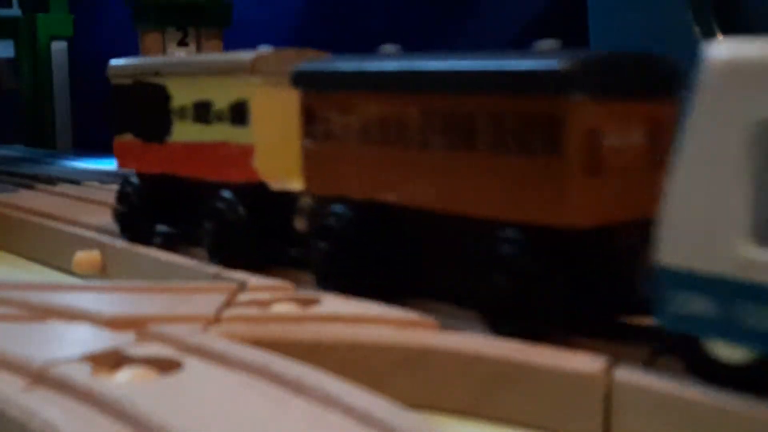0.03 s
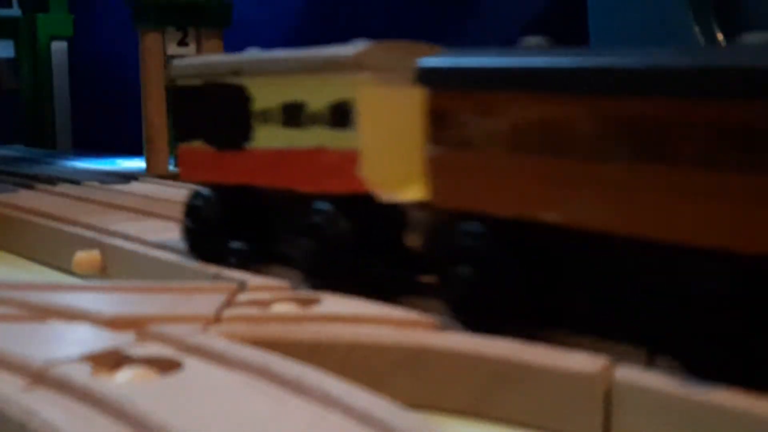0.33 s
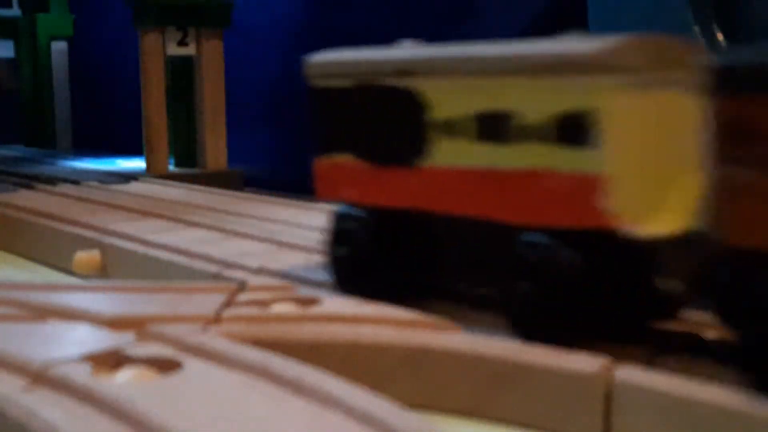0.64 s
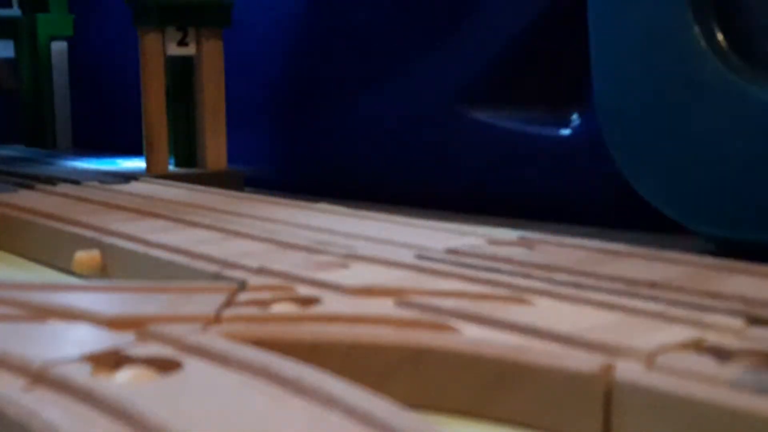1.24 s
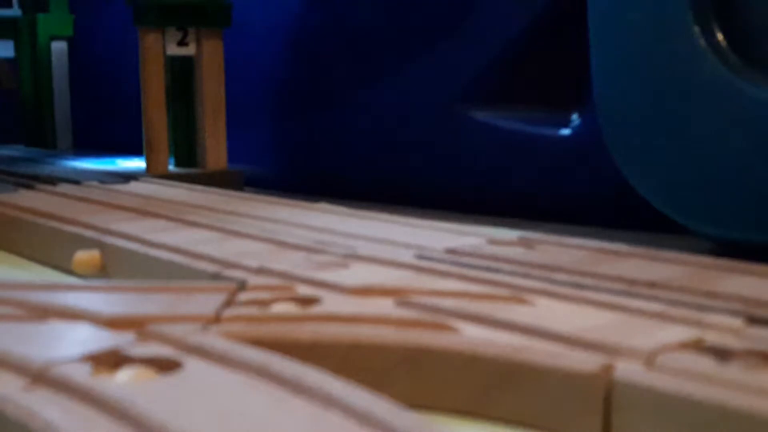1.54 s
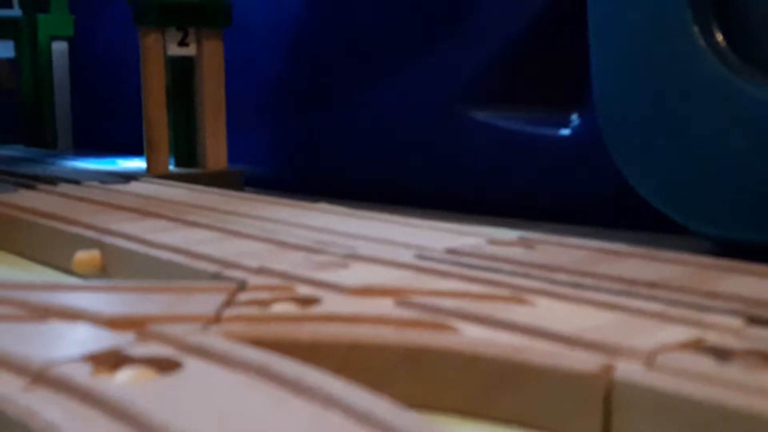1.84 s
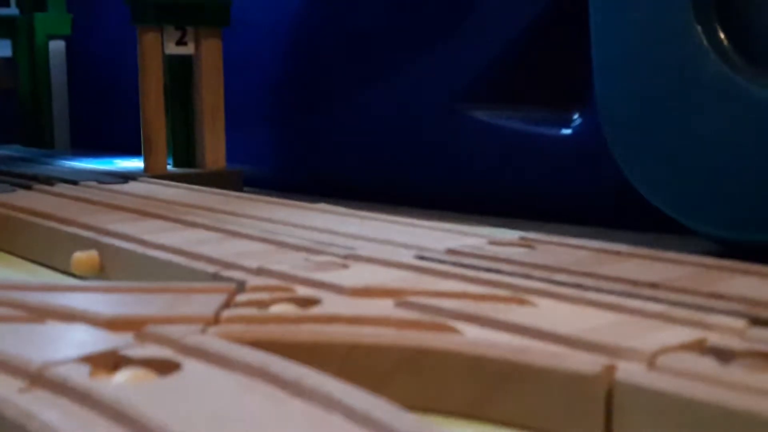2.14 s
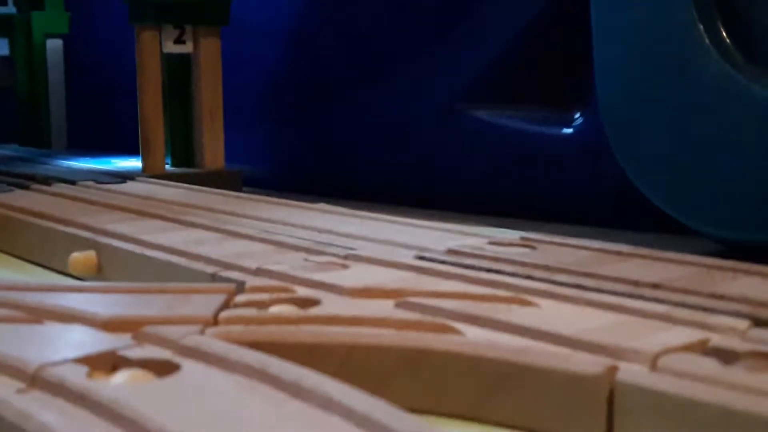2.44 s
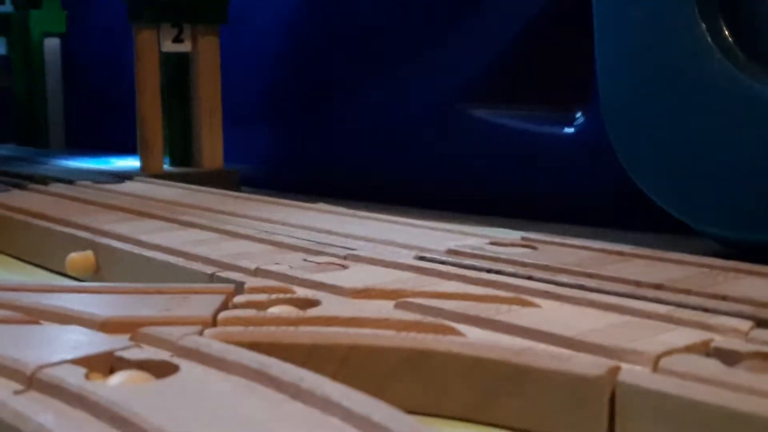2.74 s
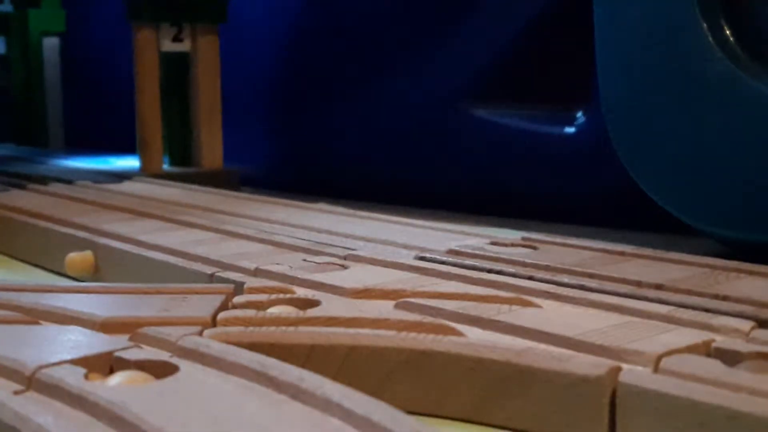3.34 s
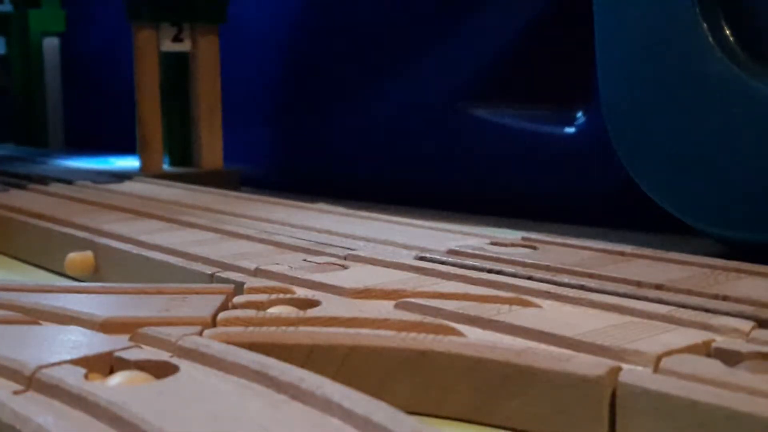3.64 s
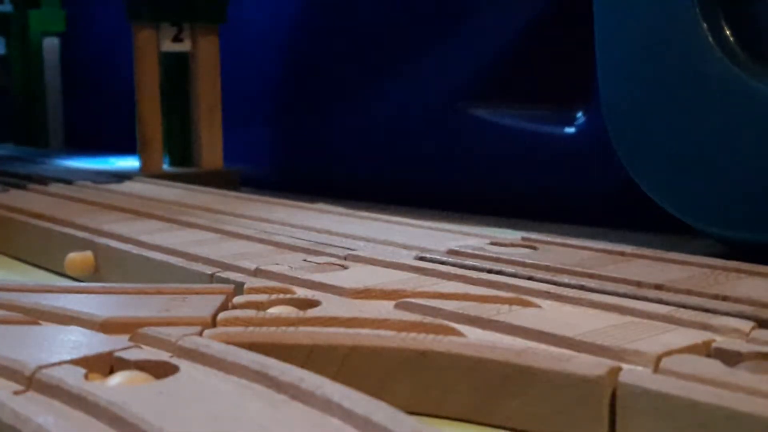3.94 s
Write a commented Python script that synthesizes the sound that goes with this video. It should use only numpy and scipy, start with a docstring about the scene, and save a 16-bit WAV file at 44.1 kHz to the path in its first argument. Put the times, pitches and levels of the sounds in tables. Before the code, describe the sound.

Close by and a little to the right, a toy train rumbles along wooden track, its loose carriages clattering and axles squeaking. It slows and stops, leaving a small, quiet room with a few faint clicks and two soft rubs.

```python
"""A plastic toy train rolls along wooden track, close by and a little to the right, in a small room.
From the start its wheels rumble on the wood and knock over the joints, loose carriages rattle and dry
axles stick and slip in tiny squeaks. After two seconds it stops with a soft bump that leaves the track
humming briefly. Past the three-second mark, faint handling clicks on a hollow case and two soft rubs
come through the still air."""
import sys
import numpy as np
from scipy import signal
from scipy.fft import rfft, irfft
from scipy.io import wavfile

SR = 44100
rng = np.random.default_rng(int(sys.argv[2]) if len(sys.argv) > 2 else 0)


def generate_wav(sig):
    """Save sig (samples, or channels by samples) to the path in sys.argv[1] as 16-bit PCM at SR."""
    pcm = np.round(np.clip(np.atleast_2d(sig).T, -1, 1) * 32767).astype(np.int16)
    wavfile.write(sys.argv[1], SR, pcm)


N = 176400
TIME = np.arange(N) / SR

# Fader rides for the rumble, the carriage chatter and the grit. Each row: time in seconds, level in dB.
RUMBLE_RIDE = [(0.0, -30.5), (0.08, -38.5), (0.53, -30.5), (0.55, -26.5), (0.88, -33.5), (0.95, -29.5),
               (1.01, -29.5), (1.03, -30.5), (1.2, -34), (1.22, -27), (1.27, -34.5), (1.39, -29.5),
               (1.55, -38.5), (1.7, -37.5), (1.72, -33), (1.84, -43), (1.89, -39), (2.0, -49)]
CHATTER_RIDE = [(0, -38), (.07, -50.5), (.26, -53), (.45, -41), (.5, -41.5), (.62, -30.5), (.68, -44.5),
                (.88, -43), (1.0, -38.5), (1.12, -39.5), (1.38, -44.5), (1.5, -46.5), (1.8, -53),
                (1.88, -53), (2.0, -61)]
GRIT_RIDE = [(0, -50), (.15, -55), (.4, -53), (.55, -51), (.62, -49), (.68, -61), (.8, -52.5), (1.0, -49.5),
             (1.15, -54), (1.4, -55.5), (1.55, -56), (1.7, -65), (1.87, -63.5), (2.0, -71)]
# Wheels strike joints and couplings jerk. Each row: start in seconds, relative levels in dB of the
# wood thud, the carriage clack and the wheel tick, pitch of the struck part in Hz.
KNOCKS = [(.055, -41.5, -27, -50, 1580), (.104, -41, -32, -48, 2190), (.178, -40, -35, -52.5, 1577),
          (.218, -38, -28, -51.5, 1560), (0.236, -38, -28.5, -48.5, 3429), (0.292, -25, -24.5, -48, 2430),
          (0.3081, -16, -27.5, -52, 1380), (0.3275, -22.5, -22, -41.5, 1596), (.377, -42.5, -26, -52, 2290),
          (0.4082, -30.5, -30, -41, 2550), (0.4392, -21.5, -20.5, -35.5, 1630),
          (.446, -26.5, -26, -39, 2690), (.463, -27, -28, -38, 2304), (0.525, -27, -25, -30.5, 1650),
          (0.547, -18, -20, -29.5, 1661), (0.551, -28.5, -28, -37, 2210), (0.5622, -9.5, -29, -35, 1700),
          (0.566, -12, -36, -41, 2290), (0.6022, -34.5, -16, -26, 1820), (0.6074, -22, -45, -18.5, 1640),
          (0.6138, -16.5, -21, -34.5, 2550), (0.623, -9.5, -24, -39.5, 1460), (0.6406, -14, -26, -25, 2270),
          (0.6954, -28.5, -28.5, -39, 2360), (0.7448, -32, -41, -31.5, 1740),
          (0.752, -20.5, -27.5, -40.5, 1930), (.768, -32, -18.5, -30, 3420), (.8, -29.5, -39, -46.5, 1830),
          (.855, -27, -21.5, -38.5, 1647), (0.9419, -17, -48, -40.5, 1532),
          (0.9951, -23.5, -18.5, -29, 1620), (1.0308, -33, -23, -43, 2450), (1.038, -9, -22.5, -36.5, 2320),
          (1.0516, -18, -20.5, -40, 1650), (1.0891, -16, -17.5, -25, 1320),
          (1.145, -16, -25.5, -32.5, 2160), (1.1766, -21, -21.5, -39, 1640),
          (1.1912, -36.5, -17.5, -31, 1490), (1.207, -23.5, -19.5, -35, 1630),
          (1.2288, -15.5, -26, -36, 1920), (1.242, -31.5, -31.5, -47.5, 1700),
          (1.289, -35, -23.5, -29, 1990), (1.331, -20.5, -23, -44, 2090), (1.346, -28, -25.5, -39, 2110),
          (1.3666, -20, -38.5, -35, 2000), (1.3709, -16.5, -21, -32.5, 2060),
          (1.4283, -30.5, -22, -31.5, 1610), (1.456, -31.5, -31, -45, 1690),
          (1.583, -32.5, -28, -35.5, 1860), (1.7137, -29, -29.5, -48, 1760),
          (1.7276, -21.5, -57, -38.5, 1400), (1.7615, -24, -37, -44, 1400), (1.7854, -24, -34, -57, 2130),
          (1.879, -38.5, -34.5, -49, 1765), (1.921, -35, -35.5, -53, 1771), (1.975, -42.5, -36, -61, 1780)]
# Loose track rocks with a hollow note. Each row: start in seconds, level in dB, pitch in Hz.
LOOSE_TRACK = [(.002, -10.5, 574), (0.11, -23.5, 550), (.186, -25.5, 547), (0.448, -20, 457),
               (.548, -20.5, 322), (0.619, -21, 376), (0.718, -21.5, 540), (0.75, -29, 280),
               (.849, -25, 236), (.918, -19.5, 375.9), (0.943, -18.5, 294), (.959, -24.5, 290),
               (1.037, -14, 511), (1.228, -27, 295), (1.323, -21.5, 383), (1.664, -30.5, 280),
               (1.719, -27.5, 268), (1.805, -27.5, 336), (1.921, -32, 372)]
# The colour of track, shells, wheels and axle scrape. Each row: frequency in Hz, relative level in dB.
WOOD_TONE = [(30, -48), (60, -36.5), (110, -12), (180, -8), (290, -1), (440, -3), (580, -2), (720, -5.5),
             (880, -14), (1200, -20.5), (2500, -38), (8000, -82)]
CARRIAGE_TONE = [(200, -42.5), (800, -17.5), (1200, -9), (1600, 4.5), (1950, 0), (2350, -3), (3100, -10),
                 (4300, -10.5), (6000, -24), (16000, -45)]
WHEEL_TONE = [(1000, -13.5), (3000, -19.5), (5000, -0.5), (6200, -3.5), (7500, 0), (8600, 2.5), (9700, -9),
              (12500, -4.5), (15500, -15.5)]
SCRAPE_TONE = [(2000, -20.5), (4500, -8), (6300, -12.5), (7000, -3), (7900, 1), (8800, 2.5), (10000, -23),
               (12500, -20.5), (14000, -6), (15500, -11.5)]
# Long rings of track and floor. Each row: pitch in Hz, relative level in dB, 60 dB decay in seconds.
TRACK_MODES = [(176.3, -3, 0.4), (194.6, 2, 0.39), (271.6, -2.5, 0.17), (375, 1, 0.49), (415, -4, 0.1474),
               (528, -0.5, .16), (582.4, -3.5, 0.31)]
# Axle squeaks. Each row: start and length in seconds, pitch in Hz, relative level in dB,
# stutter depth in dB, the octave against the fundamental in dB.
SQUEAKS = [(0.0, 0.0087, 7300, -25, 5, -14), (.0065, 0.0096, 7360, -17.5, -1, -14),
           (.018, 0.0087, 7570, -22.5, 0, -16), (0.024, 0.031, 7390, -35.5, -1, -22),
           (0.053, 0.0094, 7270, -22.5, -5, -20), (0.102, 0.025, 7430, -28, 7, -10.5),
           (0.121, 0.031, 7390, -31.5, -0.5, -17), (0.453, 0.013, 6950, -30.5, 5, 0),
           (0.492, 0.017, 7120, -25.5, 3, -4), (0.777, 0.016, 6910, -23.5, 3.5, -9.5),
           (0.786, 0.014, 7400, -40.5, -4, -17.5), (0.837, 0.015, 7270, -31.5, -0.5, -10.5),
           (0.853, 0.018, 6970, -28.5, -4.5, 6), (0.867, 0.014, 7420, -13.5, 3.5, -16.5),
           (0.882, 0.012, 7540, -15.5, 1, -11.5), (0.895, .034, 7390, -13.5, 0, -17),
           (0.932, 0.012, 7330, -13.5, -4, -32), (1.179, 0.01, 6800, -30.5, 14, -14),
           (1.245, 0.016, 6760, -30.5, 7, -18), (1.257, 0.028, 6940, -26.5, 2, -5.5),
           (1.292, 0.042, 6990, -38, 3, -23), (1.33, 0.028, 6910, -32, 5.5, -15),
           (1.501, 0.0063, 7100, -35, 11, -22), (1.671, 0.012, 7320, -38, 19, -24),
           (1.776, 0.011, 7390, -33, 9.5, -15), (1.985, 0.02, 7440, -41, -1, -23),
           (0.222, 0.022, 10800, -48.5, 1.5, -33), (0.413, 0.01, 10800, -43, 1.5, -36)]
# The track's hum at the stop. Each row: pitch in Hz, level in dB, 60 dB decay in seconds.
SETTLE_MODES = [(140, -47, .4), (175, -41, .4), (364, -48, .18)]
# Handling clicks. Each row: start in seconds, relative levels in dB of the snap and the hollow knock.
CLICKS = [(3.316, -49, -49.5), (3.3306, -38, -47), (3.378, -49.5, -42.5), (3.383, -56, -46),
          (3.412, -51, -64), (3.4255, -36, -56), (3.433, -54, -56), (3.748, -49, -63), (3.7685, -42, -61),
          (3.858, -60, -44.5), (3.873, -48.5, -66)]
# Crisp edges on the sharpest clicks. Each row: start in seconds, level in dB.
CRISP_EDGES = [(3.3313, -30), (3.7682, -34), (3.858, -50), (3.872, -40)]
# Fader rides for the rubs and the hiss that ends the first. Each row: time in seconds, level in dB.
RUB_RIDE = [(3.46, -86.5), (3.505, -57.5), (3.575, -51.5), (3.6, -61), (3.63, -81), (3.82, -71.5),
            (3.86, -55), (3.9, -82)]
HISS_RIDE = [(3.53, -86.5), (3.555, -59), (3.585, -58), (3.61, -91)]
# The colour of each handling layer and of the air. Each row: frequency in Hz, relative level in dB.
SNAP_TONE = [(200, -17), (950, 2.5), (1600, -1.5), (2400, -5.5), (3150, 4), (4500, -14), (6200, -23.5),
             (8100, -7.5), (10000, -23), (13000, -12), (16000, -14.5)]
CASE_TONE = [(60, -15), (170, 3.5), (280, 4), (600, -10.5), (930, 7.5), (1200, -6), (2200, -4), (4000, -42),
             (12000, -42)]
CRISP_TONE = [(500, -16), (2000, -8), (5000, -2), (10000, -3), (15000, 2)]
RUB_TONE = [(59, -41), (100, -19.5), (264, -13.5), (347, -9), (429, -24.5), (564, -2), (614, -12.5),
            (1490, -17.5), (2750, -20.5), (5510, -36), (8230, -25), (15500, -33)]
HISS_TONE = [(2000, -20.5), (6500, -13.5), (8200, -3), (10000, -14.5), (13500, -1.5), (16000, -1.5)]
AIR_TONE = [(15, -38.5), (25, -13), (33, -8.5), (58, -2.5), (91, -8.5), (130, 2), (165, -4), (291, -3.5),
            (604, -8.5), (654, -9), (1510, -9.5), (5090, -23), (15800, -24)]
# How centred the air is. Each row: frequency in Hz, left-right correlation (negatives count as zero).
AIR_LIKENESS = [(60, 0.042), (240, 0.14), (950, -0.09), (3770, -0.04), (15000, 0.01)]
# The room's tail. Each row: frequency in Hz, 60 dB decay in seconds.
ROOM_T60 = [(150, 0.47), (500, 0.27), (2000, 0.4), (7500, 0.24), (15000, 0.17)]

BUMPS_PER_S, BUMP_SPREAD_DB = 1300, 3
PART_TAPS_PER_S, PART_SPREAD_DB, PART_CYCLES = 270, 2.5, 22
CLUMP_RATE_HZ = 24
STOP_S, STOP_DB_PER_S = 2.007, 379.5


def from_db(db):
    """Decibels to gain."""
    return 10 ** (np.asarray(db) / 20)


def rms_one(x):
    """Scale to an rms of one."""
    return x / np.sqrt(np.mean(x ** 2) + 1e-20)


def ride(rows):
    """Gain along a fader ride, straight in dB between its points."""
    return from_db(np.interp(TIME, *np.transpose(rows)))


def running(rows):
    """A fader ride that dies quickly once the train stops."""
    return ride(rows) * from_db(-STOP_DB_PER_S * np.maximum(TIME - STOP_S, 0))


def at_hz(points, hz):
    """Read a curve on a log-frequency axis."""
    f, value = np.transpose(points)
    return np.interp(np.log(np.maximum(hz, 1)), np.log(f), value)


def drift(rate_hz):
    """A smooth random wander with an rms of one."""
    r = np.exp(-2 * np.pi * rate_hz / SR)
    return rms_one(signal.lfilter([1], [1, -2 * r, r * r], rng.standard_normal(2 * N))[N:])


def through(force, tone, size=4096):
    """Drive a body of this colour; one tap gives a minimum-phase ring with a peak of one."""
    hz = np.arange(size // 2 + 1) * SR / size
    cepstrum = irfft(np.log(from_db(at_hz(tone, hz))))
    cepstrum[1:size // 2] *= 2
    cepstrum[size // 2 + 1:] = 0
    tap = irfft(np.exp(rfft(cepstrum)))
    return signal.fftconvolve(force, tap / np.abs(tap).max())[:N]


def ring(force, hz, t60):
    """Drive one decaying mode."""
    r, w = from_db(-60 / (t60 * SR)), 2 * np.pi * hz / SR
    return signal.lfilter([1, 0, -1], [1, -2 * r * np.cos(w), r * r], force)


def grains(per_s, spread_db):
    """A random spray of small contacts of uneven size."""
    sizes = from_db(spread_db * np.minimum(rng.exponential(1, N), 4))
    return sizes * rng.choice([-1, 1], N) * (rng.random(N) < per_s / SR)


def blows(times, peaks_db, scuff_db, scuff_s=0.0012, rise_s=0.0015, size=1024):
    """Each blow is a tap inside a short scuff that swells and dies."""
    force, lead = np.zeros(N + size), size // 4
    t = TIME[:size] - TIME[lead]
    scuff = from_db(scuff_db) * np.exp(-np.maximum(t / scuff_s, -t / rise_s))
    for s, db in zip(times, peaks_db):
        blow = scuff * rng.standard_normal(size)
        blow[lead] = 1
        start = int(s * SR) - lead
        force[start:start + size] += from_db(db) * blow
    return force[:N]


def struck(times, levels_db, pitches, cycles, rise_s):
    """Each strike rings at its own pitch and dies by 60 dB within so many cycles."""
    out = np.zeros(N)
    for start, db, hz in zip(times, levels_db, pitches):
        on = (TIME > start) & (TIME < start + cycles / hz)
        t = TIME[on] - start
        envelope = from_db(db - 60 * t * hz / cycles) * (1 - np.exp(-t / rise_s))
        out[on] += envelope * np.sin(2 * np.pi * hz * t)
    return out


def track():
    """Dense wheel bumps, joint thuds and rocking track pieces drive the wood and its long rings."""
    starts, thud_db, _, _, _ = np.transpose(KNOCKS)
    bumps = rms_one(through(grains(BUMPS_PER_S, BUMP_SPREAD_DB), WOOD_TONE))
    thuds = through(blows(starts, thud_db - 1.5, scuff_db=-23), WOOD_TONE)
    hollows = struck(*np.transpose(LOOSE_TRACK), cycles=16, rise_s=0.0016)
    wood = running(RUMBLE_RIDE) * bumps + thuds + hollows
    rings = sum(from_db(db) * rms_one(ring(wood, hz, t60)) for hz, db, t60 in TRACK_MODES)
    return wood + from_db(-9.5) * wood.std() * rms_one(rings)


def carriages():
    """Loose plastic shells rattle in clumps and clack at each knock."""
    starts, _, clack_db, _, _ = np.transpose(KNOCKS)
    rattle = grains(per_s=1400, spread_db=2.5) * from_db(6.5 * drift(CLUMP_RATE_HZ))
    clacks = through(blows(starts, clack_db - 4.5, scuff_db=-9), CARRIAGE_TONE)
    return from_db(4) * running(CHATTER_RIDE) * rms_one(through(rattle, CARRIAGE_TONE)) + clacks


def small_parts(low_hz=1400, high_hz=3000, count=14):
    """Couplings and wheels ping briefly, each at its own pitch: at random and at each knock."""
    taps = grains(PART_TAPS_PER_S, PART_SPREAD_DB)
    part_hit = rng.integers(0, count, N)
    trickle = 1e-18 * (-1) ** (np.arange(N) // 2)  # inaudible; keeps the rings from underflowing
    rattle = sum(ring(taps * (part_hit == part) + trickle, hz, PART_CYCLES / hz) / hz
                 for part, hz in enumerate(np.geomspace(low_hz, high_hz, count)))
    starts, _, clack_db, _, part_hz = np.transpose(KNOCKS)
    pings = struck(starts, clack_db + 3, part_hz, PART_CYCLES, rise_s=0.00031)
    return from_db(-5) * running(CHATTER_RIDE) * rms_one(rattle) + pings


def wheels():
    """Fine grit crackles under the wheels, and each knock gets a bright tick."""
    starts, _, _, tick_db, _ = np.transpose(KNOCKS)
    grit = grains(per_s=1500, spread_db=3) * from_db(1.5 * drift(CLUMP_RATE_HZ))
    ticks = through(blows(starts, tick_db + 2.5, scuff_db=-11), WHEEL_TONE)
    return running(GRIT_RIDE) * rms_one(through(grit, WHEEL_TONE)) + ticks


def far_carriages():
    """The far carriages add a softer rumble and chatter, dead centre."""
    rumble = rms_one(through(grains(BUMPS_PER_S, BUMP_SPREAD_DB), WOOD_TONE))
    chatter = rms_one(through(grains(PART_TAPS_PER_S, PART_SPREAD_DB), CARRIAGE_TONE))
    return from_db(-7.5) * running(RUMBLE_RIDE) * rumble + from_db(-7) * running(CHATTER_RIDE) * chatter


def axle_squeaks(arch_hz=200, wobble_hz=80, rasp_radians=0.26, edge_s=0.003):
    """A dry axle sticks and slips: a high, wobbling, stuttering tone with its octave and a scrape."""
    wobble, stutter, rasp = drift(220), drift(220), drift(450)
    scrape = from_db(-22) * rms_one(through(rng.standard_normal(N), SCRAPE_TONE))
    out = np.zeros(N)
    for start, length, hz, db, stutter_db, octave_db in SQUEAKS:
        on = (TIME > start) & (TIME < start + length)
        t = TIME[on] - start
        arch = np.sin(np.pi * t / length) - 2 / np.pi
        pitch = hz + arch_hz * arch + wobble_hz * wobble[on]
        phase = 2 * np.pi * np.cumsum(pitch) / SR + rasp_radians * rasp[on]
        tone = np.sin(phase) + from_db(octave_db) * np.sin(2 * phase) + scrape[on]
        edges = np.clip(np.minimum(t, length - t) / edge_s, 0, 1)
        flutter = rms_one(from_db(stutter_db * np.tanh(stutter[on])))
        out[on] += from_db(db + 2) * np.sin(np.pi / 2 * edges) ** 2 * flutter * tone
    return out


def settling(start_s=1.985, rise_s=0.0084):
    """The train comes to rest with a soft bump, and the track's low modes hum on."""
    t = np.maximum(TIME - start_s, 0)
    hum = sum(from_db(db - 60 * t / t60) * np.sin(2 * np.pi * hz * t) for hz, db, t60 in SETTLE_MODES)
    return hum * np.minimum(t / rise_s, 1)


def still_air(level_db=-69.5):
    """A steady, wide bed of faint air, laid bare when the train stops."""
    hz = np.arange(N // 2 + 1) * SR / N
    mid, side = rfft(rng.standard_normal((2, N))) * from_db(at_hz(AIR_TONE, hz))
    alike = np.clip(at_hz(AIR_LIKENESS, hz), 0, 1)
    mid, side = irfft(mid * np.sqrt(1 + alike)), irfft(side * np.sqrt(1 - alike))
    return from_db(level_db) * np.array([mid + side, mid - side]) / mid.std()


def handling_clicks(scuff_s=0.0019):
    """Small taps on a case: a dry snap over a hollow knock, the sharpest with a crisp edge."""
    starts, snap_db, knock_db = np.transpose(CLICKS)
    snaps = through(blows(starts, snap_db + 7, scuff_db=-13, scuff_s=scuff_s), SNAP_TONE)
    knocks = through(blows(starts, knock_db, scuff_db=-11, scuff_s=scuff_s), CASE_TONE)
    crisp = through(blows(*np.transpose(CRISP_EDGES), scuff_db=-29), CRISP_TONE)
    return snaps + knocks + crisp


def handling_rubs():
    """Dense tiny contacts blur into two soft rubs; the first ends in a thin hiss."""
    rub = rms_one(through(grains(per_s=4500, spread_db=-0.5), RUB_TONE))
    hiss = rms_one(through(rng.standard_normal(N), HISS_TONE))
    return ride(RUB_RIDE) * rub + ride(HISS_RIDE) * hiss


def room_tails(rise_s=0.0024, size=22050, bands=9):
    """The room's diffuse stereo tail, dying band by band; unit energy."""
    hz = np.arange(size // 2 + 1) * SR / size
    centres = np.geomspace(80, 16000, bands)
    white, tails = rfft(rng.standard_normal((2, size))), 0
    for centre, share in zip(centres, np.eye(bands)):
        band = irfft(white * at_hz(np.column_stack([centres, share]), hz))
        tails = tails + band * from_db(-60 * TIME[:size] / at_hz(ROOM_T60, centre))
    return rms_one(tails * np.minimum(TIME[:size] / rise_s, 1)) / np.sqrt(size)


def place(x, tails, left_db, room_db, lag_s=0.000385):
    """Set a source to the right: later and weaker on the left, with room on both sides."""
    left = from_db(left_db) * np.concatenate([np.zeros(round(lag_s * SR)), x])[:N]
    room = signal.fftconvolve(x[None], tails, axes=1)[:, :N]
    return np.array([left, x]) + from_db(room_db) * room


def near_echoes(pair, level_db=-9.5, delay_s=0.0015, decay_s=0.0027, low_cut_hz=600, size=1024):
    """The floor and nearby toys scatter all but the bass, differently on each side."""
    t = TIME[:size]
    scatter = rng.standard_normal((2, size)) * np.exp(-t / decay_s) * (t > delay_s)
    low_cut = signal.butter(2, low_cut_hz, "high", fs=SR, output="sos")
    echoes = signal.sosfilt(low_cut, rms_one(scatter)) / np.sqrt(size)
    return pair + from_db(level_db) * signal.fftconvolve(pair, echoes, axes=1)[:, :N]


def scene():
    """Mix the train and then the handling in one room, over still air."""
    tails = room_tails()
    rolling = (far_carriages()
               + place(track() + settling(), tails, left_db=-4.5, room_db=-15)
               + place(carriages() + small_parts(), tails, left_db=-8, room_db=-15)
               + place(wheels(), tails, left_db=-22, room_db=-10))
    train = near_echoes(rolling) + place(axle_squeaks(), tails, left_db=-14, room_db=-16)
    handling = place(handling_clicks() + handling_rubs(), tails, left_db=-12, room_db=-16)
    return train + handling + still_air()


def record(dry):
    """A steep high cut at 15.9 kHz."""
    return signal.sosfilt(signal.ellip(10, .2, 80, 15900, fs=SR, output="sos"), dry)


dry = scene()
out = record(dry)
generate_wav(out)
```